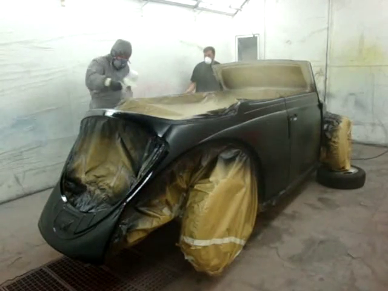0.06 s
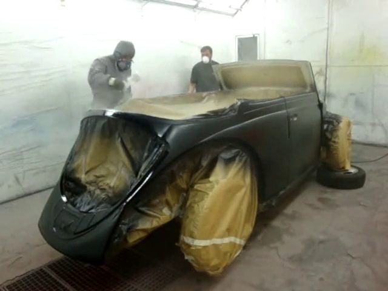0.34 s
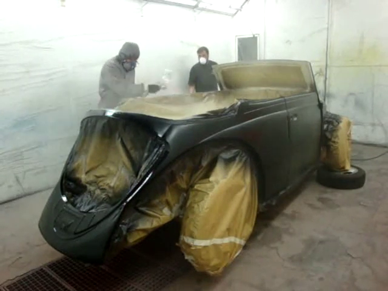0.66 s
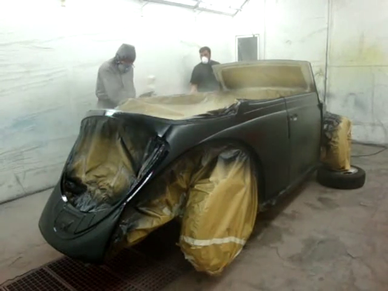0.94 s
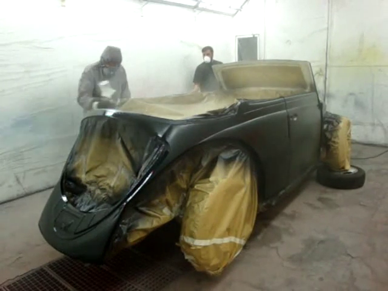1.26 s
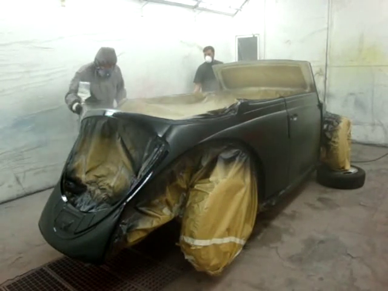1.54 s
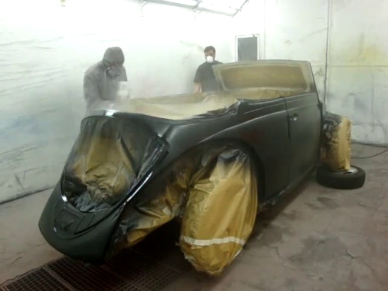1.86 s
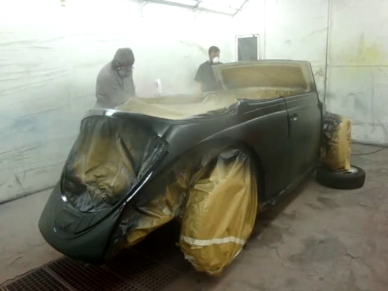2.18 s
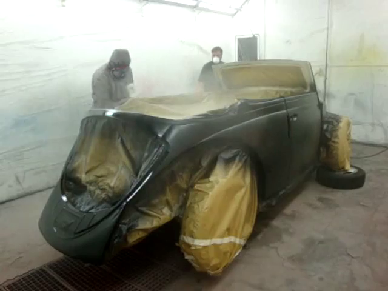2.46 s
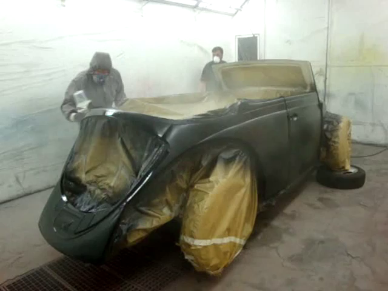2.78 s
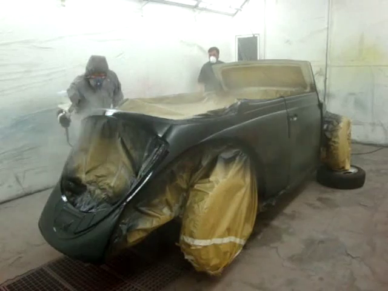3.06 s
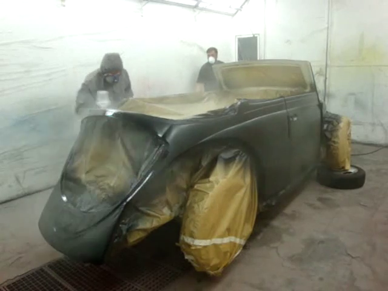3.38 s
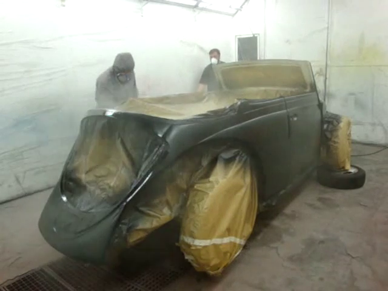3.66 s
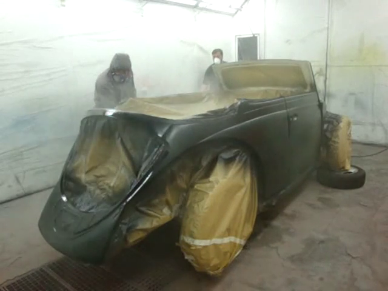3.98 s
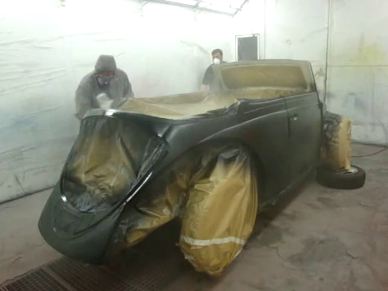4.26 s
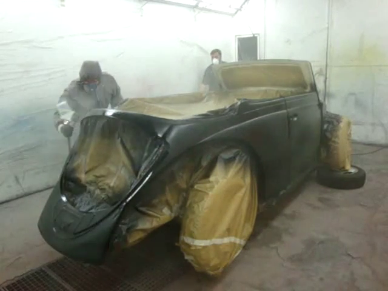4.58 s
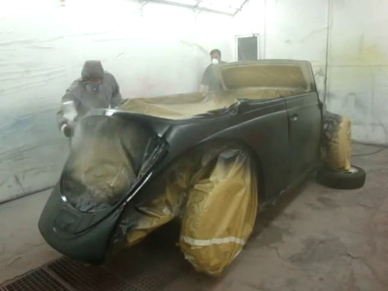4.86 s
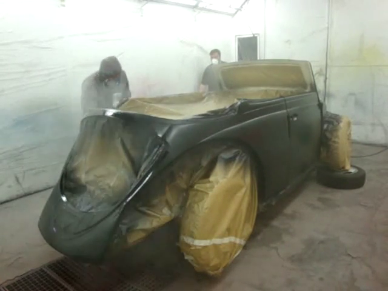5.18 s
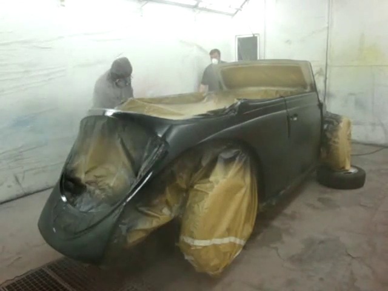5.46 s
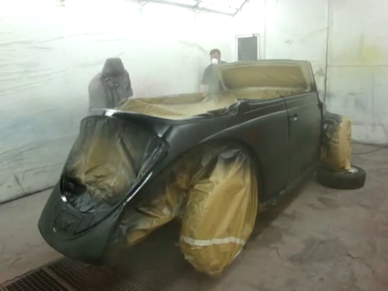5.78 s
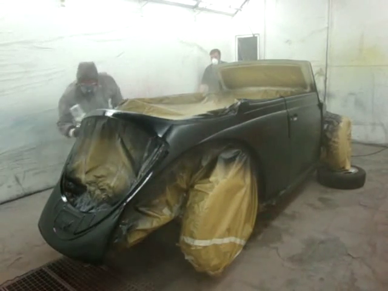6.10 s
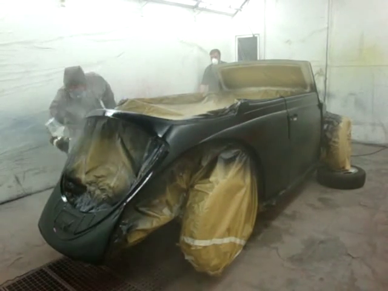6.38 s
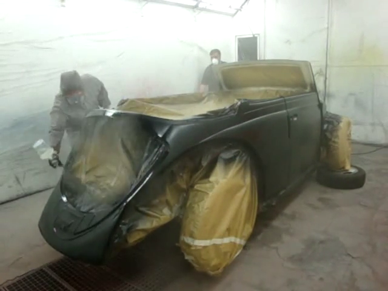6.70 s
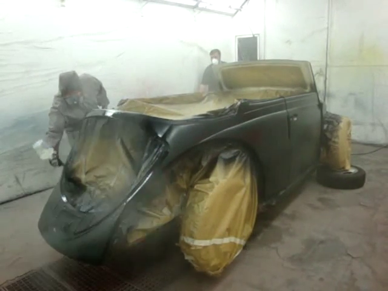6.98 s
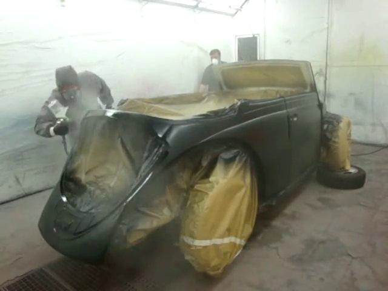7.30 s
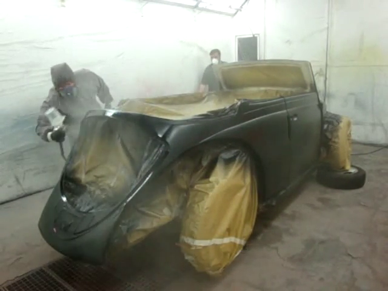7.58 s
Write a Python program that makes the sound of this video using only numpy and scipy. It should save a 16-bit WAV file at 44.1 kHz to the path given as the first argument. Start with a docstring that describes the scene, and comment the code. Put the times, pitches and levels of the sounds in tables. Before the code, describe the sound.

A compressed-air spray gun hisses continuously, swelling with each sweep over a car body in an enclosed booth, with a faint hum underneath.

```python
"""A compressed-air spray gun sweeps to and fro over a car body in a closed paint booth.
Its turbulent jet hisses without a break at the nozzle and rushes downstream, blowing a breathy note
across each edge. The air excites the body's resonances and roars when it meets a panel squarely.
The panels add short, shifting reflections and the hard walls reverberate.
Underneath, a faint hum swells with each stroke."""
import sys
import numpy as np
from scipy import signal
from scipy.fft import rfft, irfft
from scipy.io import wavfile
from scipy.ndimage import map_coordinates

SR = 44100
rng = np.random.default_rng(int(sys.argv[2]) if len(sys.argv) > 2 else 0)


def to_wav(s):
    """Save 16-bit WAV."""
    ch = np.atleast_2d(s).T  # columns
    pcm = np.round(np.clip(ch, -1, 1) * 32767)  # PCM
    wavfile.write(sys.argv[1], SR, pcm.astype(np.int16))


N = 345726
TIME = np.arange(N) / SR
FREQ = np.arange(N // 2 + 1) * SR / N
TOP_HZ = 10000


def undb(db):
    """Decibels to amplitude ratio."""
    return 10 ** (np.asarray(db) / 20)


def bell(centre, length):
    """Gaussian envelope around one moment."""
    return np.exp(-2 * ((TIME - centre) / length) ** 2)


def colour(points):
    """Spectral envelope: gain interpolated in dB over log frequency."""
    hz, db = np.transpose(points)
    return undb(np.interp(np.log(FREQ + 1), np.log(hz), db))


def resonance(hz, width):
    """Lorentzian resonance curve, 1 at the centre."""
    return 1 / (1 + (2 * (FREQ - hz) / width) ** 2)


def noise(gain, band=(0, SR)):
    """Filtered Gaussian noise with rms 1 inside the band (Hz)."""
    inside = (FREQ >= band[0]) & (FREQ <= band[1])
    return irfft(rfft(rng.standard_normal(N)) * gain, N) / np.sqrt(np.mean(gain ** 2 * inside))


def walk(hz):
    """Random modulation: noise low-passed at hz, with rms 1."""
    return noise(1 / (1 + (FREQ / hz) ** 4))


def delayed(x, lag_ms):
    """Propagation delay along a path of changing length."""
    return map_coordinates(x, [(TIME - lag_ms / 1000) * SR], order=3)


def hum(impact_db):
    """Amplitude modulation: a faint tone of steady pitch wavers and swells with each stroke."""
    pitch_hz = 299.7
    level_db = -60.5 + 1.22 * impact_db + 1.6 * walk(hz=9)
    phase = 2 * np.pi * pitch_hz * TIME + 0.1 * walk(hz=2.9)
    return np.sqrt(2) * np.sin(phase) * undb(level_db)


def booth(x, t60, wet_db, positions=16):
    """Reverberation: dense wall echoes decay exponentially, a new set for each position of the gun."""
    t = TIME[:SR // 2]
    decay = np.exp(-np.log(1000) * t / t60) * (t > .008)
    place = TIME / TIME[-1] * (positions - 1)
    wet = 0
    for k in range(positions):
        tail = rng.standard_normal(len(t)) * decay
        crossfade = np.sqrt(np.maximum(1 - abs(place - k), 0))
        wet = wet + signal.fftconvolve(x * crossfade, tail / np.linalg.norm(tail))[:N]
    return x + undb(wet_db) * wet


# The nearest panel's echo. Each row: time in seconds, delay in ms, amplitude ratio.
PANEL_ECHO = [(0, .97, .2), (.25, 1.07, .12), (.65, 1, .05), (.85, .9, .16), (1.1, .93, .13), (1.4, 1, .02),
              (5.4, 1.1, .02), (6.6, 1.2, .09), (7.84, 1.1, .07)]
def reflections(x, scatter=0.076, sway_ms=0.056):
    """Comb filtering: echoes from the panels interfere with the direct sound and glide with the hand."""
    times, *columns = np.transpose(PANEL_ECHO)
    lag_ms, strength = (np.interp(TIME, times, column) for column in columns)
    others = sum(walk(hz=2.9) * delayed(x, ms + sway_ms * walk(hz=1.04))
                 for ms in np.geomspace(.45, 3.8, 4))
    return x + strength * delayed(x, lag_ms) + scatter * others


# Strokes of the gun, each lasting until the next. Each row: start in seconds, fraction of the stroke
# at which the jet is squarest to the panel, swell of the impact in dB, swell of the air in dB.
STROKES = [(-0.29, 0.4, 7, 1.3), (0.37, .62, 7.4, 1.3), (1.69, .6, 10.5, 2.2), (3.18, 0.6, 12, 3.5),
           (4.83, .66, 12.3, 3.2), (6.53, .55, 7, 4.3), (6.96, .35, 7.2, 3), (7.56, .65, 5.5, 2)]
def strokes(end_s=8.2, impact_arch=0.57, air_arch=1.2):
    """Angle of incidence: impact and air swell, in dB, as the jet turns to face the body."""
    start, squarest, impact_db, air_db = np.transpose(STROKES)
    k = np.maximum(np.searchsorted(start, TIME, side="right") - 1, 0)
    along = (TIME - start[k]) / np.diff(start, append=end_s)[k]
    rise, fall = along / squarest[k], (1 - along) / (1 - squarest[k])
    facing = np.clip(np.minimum(rise, fall), 0, 1)
    return impact_db[k] * facing ** impact_arch, air_db[k] * facing ** air_arch


# Flares of the spray. Each row: centre in seconds, length in seconds, level change in dB.
FLARES = [(1.89, 0.12, 1.1), (3.42, .12, 0.1), (4.57, .15, 1.0), (5.73, .06, -0.2), (6.292, .14, 2),
          (7.278, .06, 1.1)]
def flares():
    """Impingement: the level changes briefly, in dB, as the jet catches a curve of the body."""
    return sum(db * bell(centre, length) for centre, length, db in FLARES)


# Dips of the spray. Each row: centre in seconds, length in seconds, depth in the rush in dB.
DIPS = [(.45, .15, 1.8), (0.94, 0.091, 1.9), (1.391, 0.076, 2.5), (1.615, .045, 6), (3.74, 0.19, 1.5),
        (4.766, .06, 3.4), (5.05, .05, 1.6), (6.49, .1, 2.5), (7.41, .08, 2.4), (7.57, .1, 3.5)]
def dips():
    """Attenuation: the spray weakens briefly, in dB, mostly as the wrist turns."""
    return sum(db * bell(centre, length) for centre, length, db in DIPS)


# Spectra of air striking the body. Each row: frequency in Hz, relative spectral level in dB.
WASH_SPECTRUM = [(150, -19.5), (260, -7.5), (400, -3.5), (470, -9), (750, -1), (860, -1), (980, -0.5),
                 (1150, 1.5), (1320, -0.5), (1700, 0.5), (2600, -14.5), (5000, -35)]
ROAR_SPECTRUM = [(180, -35), (280, -10), (400, -14), (460, -16), (520, -7.5), (620, -5), (720, -8),
                 (900, -19), (1600, -33)]
BUFFET_SPECTRUM = [(20, -30), (35, -22), (60, -17.5), (90, -5.5), (125, -11.5), (160, -2), (190, -7.5),
                   (240, 3), (280, 2), (340, -5.5), (500, -20)]
# Resonances of body and booth. Each row: frequency in Hz, bandwidth in Hz, lift in dB.
BODY_MODES = [(81, 8, 6.5), (103.8, 7.6, 10.5), (168, 12, 3), (212, 5.2, 6), (385, 9.8, 5), (507.5, 22, 6),
              (536, 9, 0), (571.5, 8.8, 8), (608, 14, 6), (628, 21.5, 8.5), (660, 10, 2.5), (677, 16, 2.5),
              (859, 22, 4.5)]
# Booms under the hardest hits. Each row: centre in seconds, length in seconds, buffet lift in dB.
BOOMS = [(1.12, .16, 2.5), (2.58, .15, 2.3), (3.89, .15, 4), (4.22, 0.12, 4.5), (5.94, .07, 2.5)]
def panels(wash_db, impact_db):
    """Forced resonance: air spreading over the hollow body washes, roars and buffets through its modes."""
    modes = undb(sum(db * resonance(hz, width) for hz, width, db in BODY_MODES))
    wash = noise(colour(WASH_SPECTRUM) * modes, band=(750, 1400))
    roar = noise(colour(ROAR_SPECTRUM) * modes, band=(480, 720))
    buffet = noise(colour(BUFFET_SPECTRUM) * modes, band=(60, 275))
    boom_db = sum(db * bell(centre, length) for centre, length, db in BOOMS)
    roar_db = -56 + impact_db + .8 * boom_db + .7 * walk(hz=7)
    buffet_db = -64.5 + .91 * impact_db + boom_db + .8 * walk(hz=4)
    return wash * undb(wash_db + .8 * walk(hz=12)) + roar * undb(roar_db) + buffet * undb(buffet_db)


# Edges that the jet crosses. Each row: centre in seconds, length in seconds, pitch in Hz, level in dB.
EDGE_CROSSINGS = [(3.42, 0.15, 1590, -46.5), (4.53, 0.27, 1610, -45), (6.329, 0.25, 1680, -43.5),
                  (7.25, 0.09, 1620, -50), (7.79, 0.052, 1620, -48)]
def edge_tones():
    """Edge tone: the jet blows a breathy, narrow-band note across each edge that it passes."""
    return sum(noise(resonance(hz, width=270)) * undb(db) * bell(centre, length)
               for centre, length, hz, db in EDGE_CROSSINGS)


def flutter(x, depth_db, rate_hz, bands=9):
    """Band-wise modulation: eddies and the turning gun make each frequency band swell on its own."""
    spectrum = rfft(x)
    place = np.minimum(FREQ / TOP_HZ, 1) * (bands - 1)
    parts = (irfft(spectrum * np.maximum(1 - abs(place - k), 0), N) for k in range(bands))
    return sum(part * undb(depth_db * walk(rate_hz)) for part in parts)


# Spectra of the free jet. Each row: frequency in Hz, relative spectral level in dB.
HISS_SPECTRUM = [(2000, -39), (3500, -14), (5200, -3), (7000, 0), (7900, 1), (9000, 0.3), (10000, -2),
                 (12000, -44)]
RUSH_SPECTRUM = [(900, -23.5), (1600, -9), (2300, -2.5), (3000, -2), (3500, 0), (4500, -0.9), (5500, -3.5),
                 (7000, -5.5), (9000, -21)]
def jet(air_db, dip_db):
    """Turbulent mixing: fine eddies at the nozzle hiss, and larger ones downstream rush."""
    hiss_db = -30.5 + .63 * air_db - .45 * dip_db + .35 * walk(hz=9)
    rush_db = -36.5 + air_db - dip_db + .23 * walk(hz=9)
    hiss = noise(colour(HISS_SPECTRUM), band=(5500, 10000))
    rush = noise(colour(RUSH_SPECTRUM), band=(2000, 4500))
    roughness_db = .98 * walk(hz=150)  # a fast random flicker roughens the hiss
    air = hiss * undb(hiss_db + roughness_db) + rush * undb(rush_db)
    return flutter(air, depth_db=.32, rate_hz=11)


def scene():
    """Superposition: spray, car body and hum add, all modulated by the same strokes."""
    flare_db, dip_db = flares(), dips()
    impact_db, air_db = (swell + flare_db for swell in strokes())
    body_dip_db = .75 * dip_db
    wash_db = -50.5 + .7 * air_db + .33 * impact_db + .9 * flare_db - body_dip_db
    drive_db = impact_db - body_dip_db
    spray = reflections(jet(air_db, dip_db) + edge_tones())
    return (booth(spray, t60=.5, wet_db=-16) + panels(wash_db, drive_db) + hum(drive_db))[None]


def record(dry):
    """Band limiting: a small microphone loses the deep bass and cuts the top steeply."""
    highpass = signal.butter(3, 45, "highpass", fs=SR, output="sos")
    lowpass = signal.ellip(12, .1, 80, TOP_HZ, fs=SR, output="sos")
    return signal.sosfilt(lowpass, signal.sosfilt(highpass, dry))


dry = scene()
out = record(dry)
to_wav(out)
```